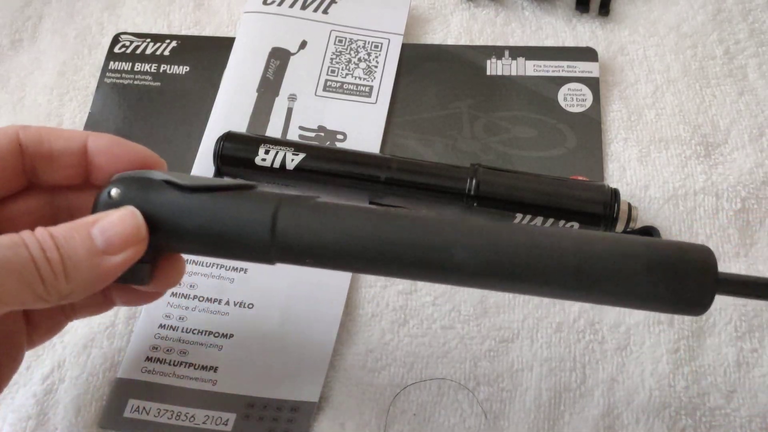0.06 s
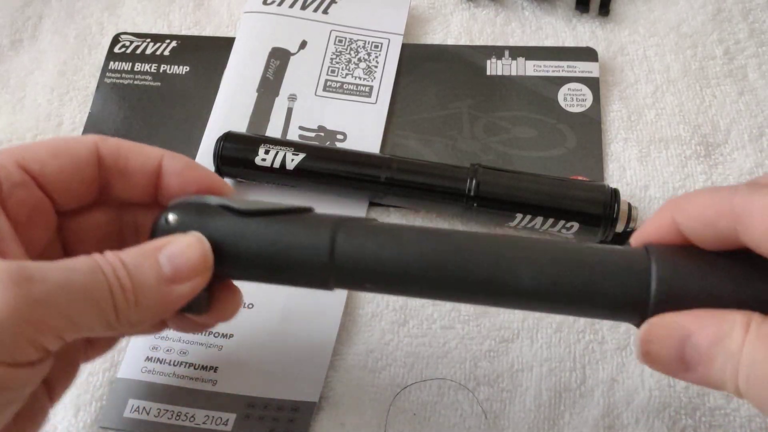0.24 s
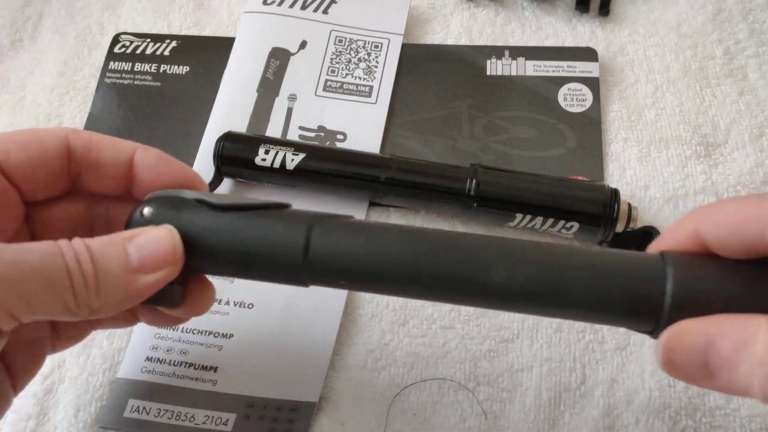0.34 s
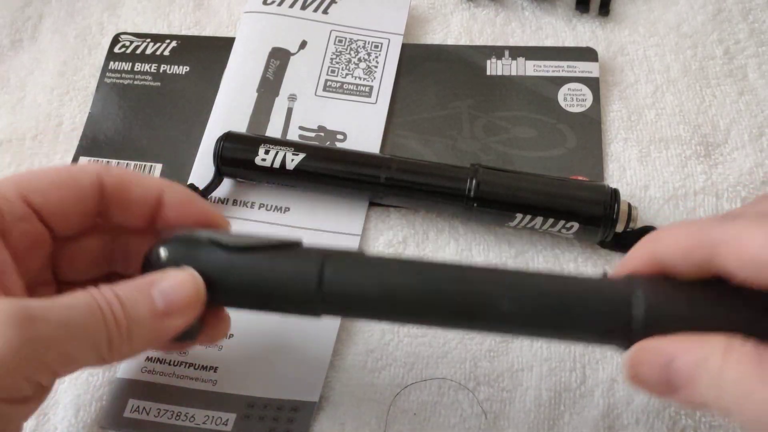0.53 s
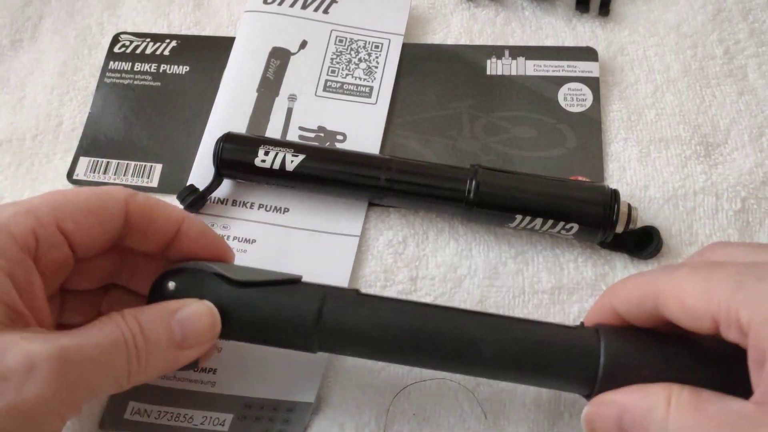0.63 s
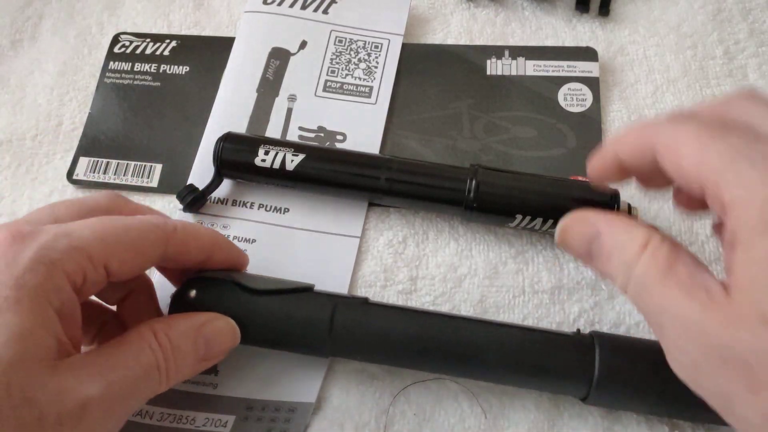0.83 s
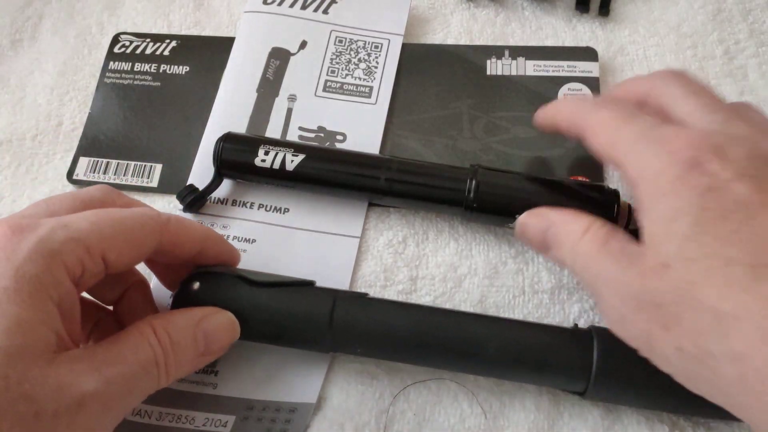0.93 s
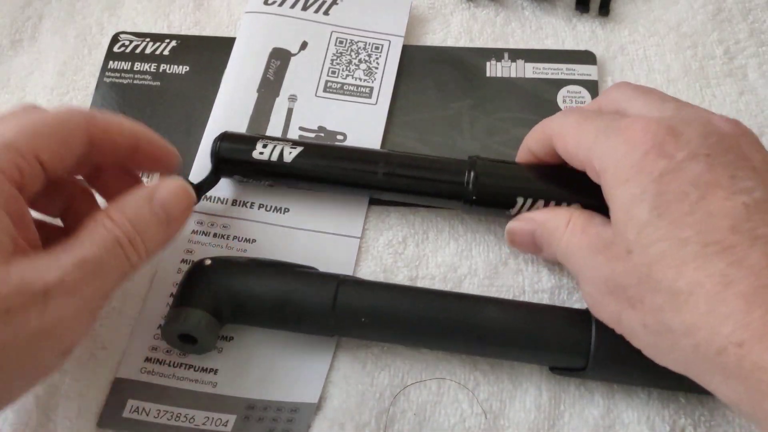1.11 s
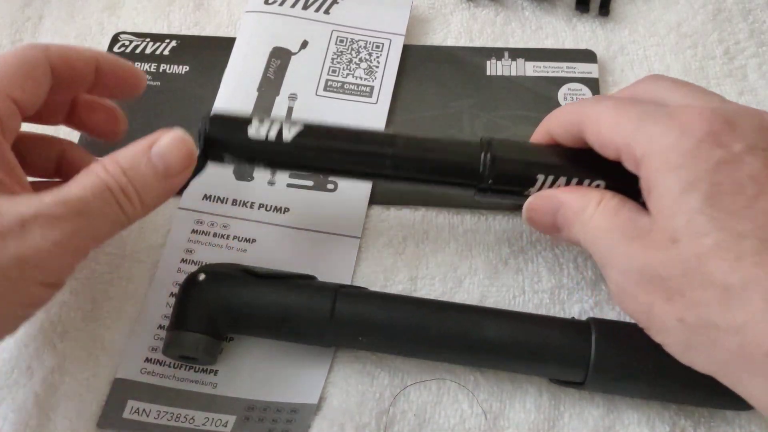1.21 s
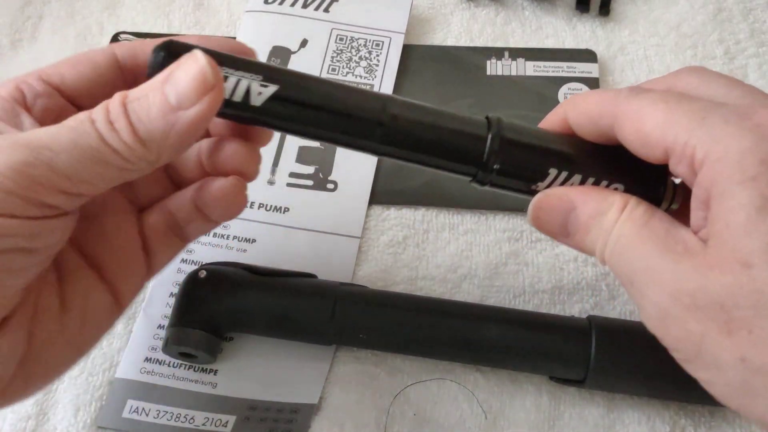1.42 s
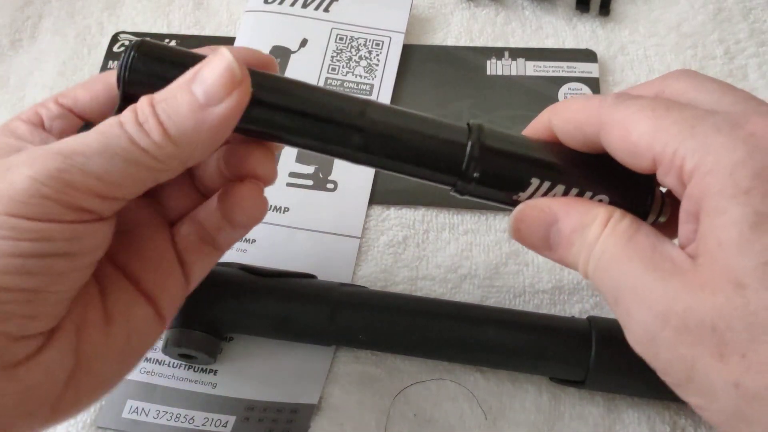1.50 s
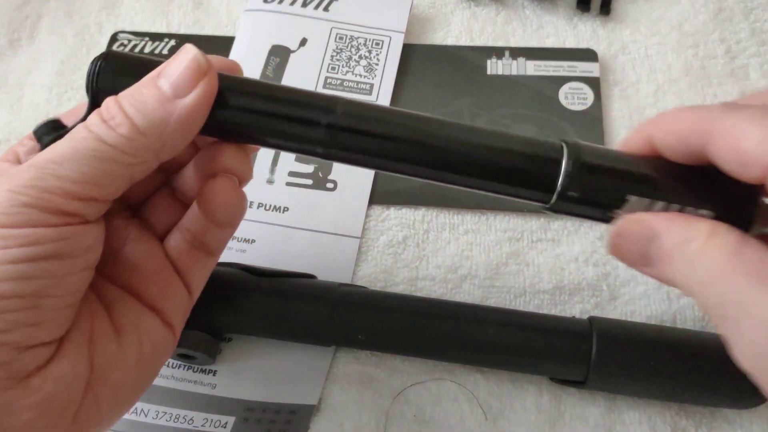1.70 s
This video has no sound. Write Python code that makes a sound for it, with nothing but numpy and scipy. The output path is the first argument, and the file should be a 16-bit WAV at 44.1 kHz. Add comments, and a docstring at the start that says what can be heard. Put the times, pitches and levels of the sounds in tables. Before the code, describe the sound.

Two quick hisses and thuds from a small hand pump, then soft plastic handling clicks.

```python
"""Hand pump, close up

A small hand pump is pushed home twice: air hisses through the valve and the handle thuds on its stop.
Between pushes the piston slides back softly. The pump is laid on a cloth; a second one is grasped,
and its loose plastic parts tick. A small, quiet room answers."""
import sys
import numpy as np
from scipy import signal
from scipy.fft import rfft, irfft, next_fast_len
from scipy.io import wavfile
from scipy.ndimage import map_coordinates

SR = 44100
rng = np.random.default_rng(int(sys.argv[2]) if len(sys.argv) > 2 else 0)


def dump_mix(stems):
    """Bounce the given channels to the path in sys.argv[1] as a 16-bit WAV at rate SR."""
    frames = np.atleast_2d(stems).T  # one column per channel
    limited = np.clip(frames, -1, 1)  # hard clip at full scale
    pcm = np.round(limited * 32767).astype(np.int16)
    wavfile.write(sys.argv[1], SR, pcm)


N = 77175
TIME = np.arange(N) / SR
GRAIN_DB, GRAIN_HZ = 1, 655  # depth and rate of the roughness in all friction


def amp(db):
    """Decibels to gain."""
    return 10 ** (np.asarray(db) / 20)


def unit(x):
    """Scale to rms 1."""
    return x / np.sqrt(np.mean(x ** 2) + 1e-20)


def along(points, hz):
    """Read a curve of (Hz, value) points on a log frequency axis."""
    freqs, values = np.transpose(points)
    return np.interp(np.log(hz + 1), np.log(freqs + 1), values)


def filtered(x, response):
    """Shape x with a gain given as a function of frequency."""
    size = next_fast_len(N + SR // 2)
    return irfft(rfft(x, size) * response(np.fft.rfftfreq(size, 1 / SR)), size)[..., :N]


def noise(colour):
    """Coloured noise of rms 1."""
    return unit(filtered(rng.standard_normal(N), lambda hz: amp(along(colour, hz))))


def stereo_noise(colour, width):
    """Coloured noise whose width curve sets the side level against the mid."""
    mid = noise(colour)
    side = filtered(noise(colour), lambda hz: amp(along(width, hz)))
    return np.array([mid + side, mid - side])


def wide_noise(colour):
    """Stereo noise of rms 1 for air and friction, wider in the treble."""
    # Stereo width. Each row: frequency in Hz, side over mid in dB.
    width = [(100, -14.5), (700, -6.5), (2300, -3.5), (4400, -4), (8000, -1.5), (15000, -3.5)]
    return unit(stereo_noise(colour, width))


def wobble(rate):
    """A smooth random curve, rate knots a second."""
    return map_coordinates(rng.standard_normal(int(N * rate / SR) + 4), [TIME * rate])


def panned(x, pan_db):
    """Place x in stereo, the left pan_db above the right."""
    return x * amp(np.array([[pan_db / 2], [-pan_db / 2]]))


def since(start):
    """Seconds since start, zero before."""
    return np.maximum(TIME - start, 0)


def ring(start, modes, scatter_db, detune):
    """Damped modes struck at start; each contact shifts their levels and pitches a little."""
    t, out = since(start), np.zeros(N)
    for k, (hz, db, t60) in enumerate(modes):
        decay = amp(db + scatter_db * rng.normal() - 60 * t / t60)
        struck_hz = hz * (1 + detune * rng.normal())
        out += (-1) ** k * decay * np.sin(2 * np.pi * struck_hz * t)
    return out


def room_tone():
    """A faint bed of still air: a narrow low end under a wide hiss."""
    # Tone of the still room. Each row: frequency in Hz, level in dB.
    colour = [(20, -14), (60, -20), (130, -12), (200, -18.5), (285, -6.5), (370, -14.5), (500, -15.5),
              (1000, -22), (2000, -25), (5000, -28), (15500, -31)]
    return amp(-71.5) * stereo_noise(colour, width=[(100, -4.0), (400, -5.0), (1500, 0.5)])


def room_modes(x):
    """Standing waves of the room hum on after each knock."""
    # Standing waves. Each row: frequency in Hz, level in dB, t60 in seconds.
    modes = [(283, 2.5, .3), (329, -1, .22), (650, -9, .2)]
    hum = ring(0, modes, scatter_db=4, detune=0.001)
    return amp(-59) * signal.fftconvolve(x.mean(axis=0), hum)[:N]


def room_tail(x, build_s=0.0055, mono_below_hz=900):
    """The walls return a short tail, centred in the bass and wide in the treble."""
    # Reverb time. Each row: frequency in Hz, t60 in seconds.
    t60s = [(150, 0.04), (300, 0.16), (700, 0.22), (2000, 0.16), (7000, 0.22), (14000, 0.11)]
    # Tone of the tail. Each row: frequency in Hz, level in dB.
    colour = [(100, -15.5), (200, -6), (300, -8.5), (700, -4), (1100, -7.5), (3000, -8), (7000, -11.5),
              (14000, -7)]
    hz, t, bands = signal.stft(rng.standard_normal((2, SR // 2)), SR, nperseg=256)
    fade = amp(-60 * t / along(t60s, hz)[:, None]) * (1 - np.exp(-t / build_s))
    fade /= np.linalg.norm(fade, axis=1, keepdims=True)
    _, tails = signal.istft(bands * fade, SR, nperseg=256)
    wet = signal.fftconvolve(x.mean(axis=0)[None], tails / np.linalg.norm(tails), axes=1)[:, :N]
    mid = filtered(wet[0], lambda f: amp(along(colour, f)))
    side = filtered(wet[1], lambda f: amp(along(colour, f)) * f / np.hypot(f, mono_below_hz))
    return np.array([mid + side, mid - side])


def close_up(x, scatter_t60_s=0.022, scatter_db=-7, scatter_above_hz=1500):
    """The sound reaches the left a little early; hands and table scatter its treble to both sides."""
    # Lead of the left side. Each row: frequency in Hz, phase in radians.
    left_lead = [(200, 0), (800, 1.08), (2600, 0.87), (4000, 2), (5500, 3.5), (7500, 5), (9000, 6.5),
                 (15000, 11)]
    direct = filtered(x, lambda hz: np.exp(0.5j * along(left_lead, hz) * np.array([[1], [-1]])))
    t = np.arange(SR // 20) / SR
    scatter = rng.standard_normal((2, len(t))) * amp(-60 * t / scatter_t60_s)
    scatter /= np.linalg.norm(scatter, axis=1, keepdims=True)
    bounced = signal.fftconvolve(x, scatter, axes=1)[:, :N]
    treble = filtered(bounced, lambda hz: 1j * hz / (1j * hz + scatter_above_hz))
    return direct + amp(scatter_db) * treble


def thin(x, low_cut_hz=97):
    """Such small bodies radiate little bass."""
    return signal.sosfilt(signal.butter(2, low_cut_hz, "highpass", fs=SR, output="sos"), x)


def friction(colour):
    """Grainy rubbing noise of rms 1."""
    return unit(wide_noise(colour) * amp(GRAIN_DB * wobble(GRAIN_HZ)))


def finger_rubs():
    """Fingertips drag briefly on the barrels: dull, soft friction."""
    # Rubs. Each row: centre in seconds, half length in seconds, level in dB.
    rubs = [(0.05, 0.0042, -52), (0.867, 0.055, -73), (1.081, 0.0099, -59), (1.125, 0.0296, -62.5),
            (1.215, 0.0188, -70), (1.384, 0.035, -72), (1.445, 0.021, -73.5), (1.745, 0.019, -62.5)]
    # Skin on plastic. Each row: frequency in Hz, level in dB.
    colour = [(100, -7), (400, -6.5), (800, -2.5), (1400, 0), (2400, -6), (4500, -11), (15000, -34.5)]
    power = sum(amp(db - 10 * ((TIME - centre) / half) ** 2) ** 2 for centre, half, db in rubs)
    return np.sqrt(power) * friction(colour)


def grip_scrape(peak_s=1.776, swell_s=0.026, peak_db=-42.5):
    """The grip shifts on the second pump: a thin, bright rustle swells at the very end."""
    # Tone of the rustle. Each row: frequency in Hz, level in dB.
    colour = [(5000, -33.5), (9000, 0), (11500, 6), (15000, -15)]
    swell_db = peak_db - 10 * np.abs(TIME - peak_s) / swell_s
    return wide_noise(colour) * amp(swell_db + GRAIN_DB * wobble(GRAIN_HZ))


def slides():
    """Plastic friction swells and fades as the piston draws back and the pumps brush cloth and hands."""
    # Moves. Each row: peak time, rise and fall (per 10 dB) in seconds, level in dB, pan in dB.
    moves = [(0.038, 0.11, 0.15, -55.5, -1.5), (0.047, 0.011, .007, -47, 5.5),
             (0.485, 0.11, 0.038, -57.5, 1), (0.81, 0.024, 0.017, -65, -0.5), (0.881, 0.051, 0.053, -74, 1),
             (1.085, 0.014, 0.023, -57, -2.5), (1.136, 0.014, 0.024, -54, 1.5),
             (1.73, 0.031, 0.06, -59.5, -4), (1.748, 0.009, .02, -45.5, -3)]
    # Sliding plastic. Each row: frequency in Hz, level in dB.
    colour = [(100, -19.5), (400, -16), (1200, -5), (2200, -7.5), (3800, 2), (5500, 3), (8000, -2),
              (10000, -9), (13000, -10.5), (15500, -19.5)]
    power = np.zeros((2, N))
    for peak, rise, fall, db, pan_db in moves:
        from_peak = np.abs(TIME - peak) / np.where(TIME < peak, rise, fall)
        power += panned(amp(db - 10 * from_peak ** 1.05), pan_db) ** 2
    return np.sqrt(power) * friction(colour)


def crack(start, t60):
    """The dry edge of a plastic contact: a noise burst that dies quickly."""
    # Tone of the burst. Each row: frequency in Hz, level in dB.
    colour = [(100, -5.5), (400, -5), (1250, -2), (2200, -8.5), (3500, 0), (5600, 3), (7500, -4.5),
              (9500, -4.5), (15000, -7)]
    t = since(start)
    return wide_noise(colour) * (t > 0) * amp(-60 * t / t60)


def ticks(chatter_db=-2.5, chatter_t60_s=0.034, edge_db=-13.5, pivot_hz=3300):
    """A loose part taps the second pump and chatters in tiny rebounds; each tap rings brighter or duller by its
    own hardness."""
    # Taps. Each row: start in seconds, level in dB, pan in dB, hardness as a tilt in dB per octave.
    taps = [(1.267, -61.5, 1.5, -7.5), (1.3398, -56, 1.5, -1), (1.343, -59, 3.5, -0.5),
            (1.3644, -44.5, 6.5, 1.5), (1.378, -57, 5.5, -1.5), (1.454, -60.5, 5, 2), (1.4614, -57, 4, -4),
            (1.603, -51, 2.5, 1.5), (1.6507, -44.5, 4, 0.5), (1.663, -63, -21, -1.5)]
    # Modes of the loose part. Each row: frequency in Hz, level in dB, t60 in seconds.
    loose_part = [(1315, -3.5, 0.013), (1747, -5.5, 0.012), (2162, -10.5, 0.0076), (3310, -3.5, 0.015),
                  (6030, -7, 0.0065), (7940, 2.5, 0.0074), (14000, -23, 0.0045)]
    out, t = np.zeros((2, N)), np.arange(SR // 10) / SR
    for start, db, pan_db, tilt_db in taps:
        modes = [(hz, level + tilt_db * np.log2(hz / pivot_hz), t60) for hz, level, t60 in loose_part]
        chatter = rng.standard_normal(len(t)) ** 3 * amp(-60 * t / chatter_t60_s)  # cubed into spikes
        contacts = (t == 0) + amp(chatter_db) * chatter / np.linalg.norm(chatter)
        rattle = signal.fftconvolve(ring(start, modes, scatter_db=2.5, detune=0.015), contacts)[:N]
        edge = amp(edge_db + tilt_db) * crack(start, t60=0.014)
        out += panned(amp(db) * (rattle + edge), pan_db)
    return out


def grasp(start_s=1.0725):
    """The grasp sets the shell of the second pump ringing faintly."""
    # Modes of the shell. Each row: frequency in Hz, level in dB, t60 in seconds.
    shell = [(810, 2.5, 0.07), (1053, -4.5, 0.11), (1265, 8.5, 0.035)]
    return panned(amp(-58) * ring(start_s, shell, scatter_db=2, detune=0.0016), pan_db=2.5)


def clacks(rasp_db=-8.5):
    """Hard plastic contacts: a pitched snap and a short rasp."""
    # Hits. Each row: start in seconds, level in dB, rasp t60 in seconds, high cut in Hz, pan in dB,
    # pitch of the snap as a ratio.
    hits = [(0.062, -25, .004, 8470, -3, 1), (0.0654, -40.5, 0.013, 7500, -9.5, 0.8),
            (1.0724, -31, 0.005, 15000, -4, 1.36), (1.074, -35, 0.031, 15500, -1.5, 1.11),
            (1.7474, -33, 0.0069, 2120, 0, 0.36)]
    # Modes of the snap. Each row: frequency in Hz at ratio 1, level in dB, t60 in seconds.
    snap_modes = [(1270, -16.5, 0.0026), (3300, -0.5, 0.0039), (4900, 1.5, .002), (7800, -16.5, .0016)]
    out = np.zeros((2, N))
    for start, db, rasp_t60, high_cut_hz, pan_db, pitch in hits:
        modes = [(hz * pitch, level, t60) for hz, level, t60 in snap_modes]
        snap = ring(start, modes, scatter_db=2, detune=0.015)
        rasp = amp(rasp_db) * crack(start, rasp_t60)
        high_cut = signal.butter(3, high_cut_hz, fs=SR, output="sos")
        out += panned(signal.sosfilt(high_cut, amp(db) * (snap + rasp)), pan_db)
    return out


def barrel_knocks(contact_s=0.00039):
    """The hollow barrel thuds as the handle hits its stop, and knocks softly as it shifts in the hands."""
    # Knocks. Each row: start in seconds, level in dB.
    knocks = [(0.248, -47), (0.3049, -24), (0.5534, -50.5), (0.6351, -26.5), (.809, -59)]
    # Modes of the barrel. Each row: frequency in Hz, level in dB, t60 in seconds.
    modes = [(312, -3, 0.033), (410, 2.5, 0.0084), (665, -2.5, 0.018), (1570, -1, 0.0031)]
    out = np.zeros(N)
    for start, db in knocks:
        attack = 1 - np.exp(-since(start) / contact_s)
        out += amp(db) * attack * ring(start, modes, scatter_db=0.5, detune=0.026)
    return panned(out, pan_db=2.0)


def valve_hiss():
    """Air hisses and whistles through the valve as the piston speeds up, slows at the stop and halts."""
    # Pushes. Each row: start, fastest moment and stop in seconds, level in dB,
    # share of top speed left at the stop, pan in dB.
    pushes = [(0.182, 0.256, 0.3, -24, 0.72, -0.5), (0.554, 0.624, 0.633, -36.5, 0.8, -0.5)]
    # Hiss of the hard and the gentle push. Each row: frequency in Hz, level in dB.
    hard_hiss = [(100, -40), (300, -33), (800, -31.5), (1500, -21), (2300, -14), (2900, -12), (3500, -19),
                 (4100, -4), (5000, -5.5), (6300, -2.5), (8300, -6.5), (9400, -12), (10500, -28.5),
                 (11300, -18), (15500, -27.5)]
    gentle_hiss = [(100, -31), (300, -26.5), (1100, -27), (2200, -9.5), (3500, -15), (4500, -5.5),
                   (5500, -5), (6500, 2), (7500, -10), (8500, -16.5), (10500, -20.5), (12000, -26),
                   (15500, -29)]
    # Narrow valve resonances. Each row: centre in Hz, width in Hz, level in dB.
    resonances = [(6140, 88, 2.5), (6400, 68, -12.5), (6340, 49, 0.5), (7330, 110, -4.5), (7660, 71, -7),
                  (8310, 80, -7)]
    close_s, speed_power = 0.016, 1.96
    flutter_db, flutter_hz = 0.5, 259.5
    ripple_db, ripple_spacing_hz = 2.5, 110.54  # random fine ripple that makes the hiss's tone uneven
    ripple_knots = rng.standard_normal((2, SR // 20))

    def ripple_gain(hz):
        ripple = [map_coordinates(side, [hz / ripple_spacing_hz]) for side in ripple_knots]
        return amp(ripple_db * np.clip(ripple, -3, 1))

    def peaks(hz):
        return sum(amp(db) / (1 + (2 * (hz - centre) / width) ** 2) for centre, width, db in resonances)

    out = np.zeros((2, N))
    for push, colour, whistle_db in zip(pushes, [hard_hiss, gentle_hiss], [-6, -9.5]):
        start, fastest, stop, db, stop_speed, pan_db = push
        rise = np.sin(np.pi / 2 * np.clip((TIME - start) / (fastest - start), 0, 1))
        slowing = np.interp(TIME, [fastest, stop], [1, stop_speed])
        speed = rise * slowing * np.exp(-since(stop) / close_s)
        whistle = amp(whistle_db) * unit(filtered(rng.standard_normal(N), peaks))
        hiss = unit(filtered(wide_noise(colour), ripple_gain))
        level = speed ** speed_power * amp(db + flutter_db * wobble(flutter_hz))
        out += panned((hiss + whistle) * level, pan_db)
    return out


def scene():
    """Pumps and hands, close by, in the room."""
    air = thin(valve_hiss() + slides())
    knocks = thin(barrel_knocks())
    handling = thin(grasp() + clacks() + ticks() + finger_rubs() + grip_scrape())
    room_send = air + amp(1) * knocks + amp(-2) * handling  # the handling is nearer, so drier
    return close_up(air + knocks + handling) + room_tail(room_send) + room_modes(room_send) + room_tone()


def record(dry, top_hz=15700):
    """A steep high cut takes off the very top."""
    return filtered(dry, lambda hz: hz < top_hz)


dry = scene()
out = record(dry)
dump_mix(out)
```